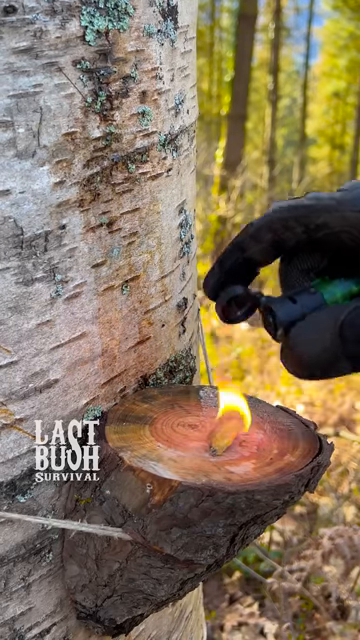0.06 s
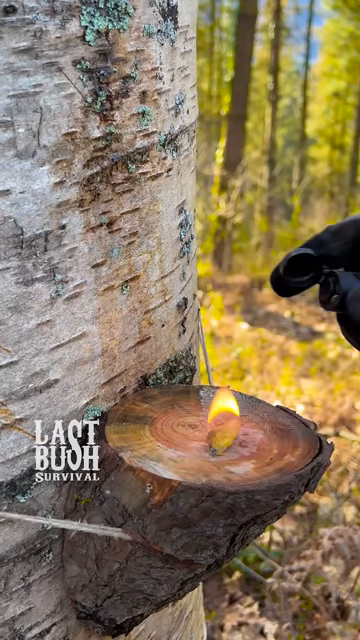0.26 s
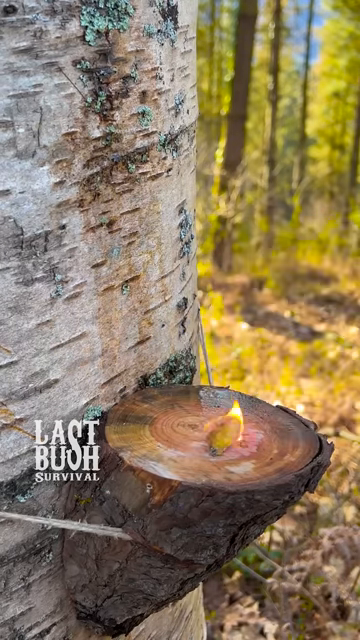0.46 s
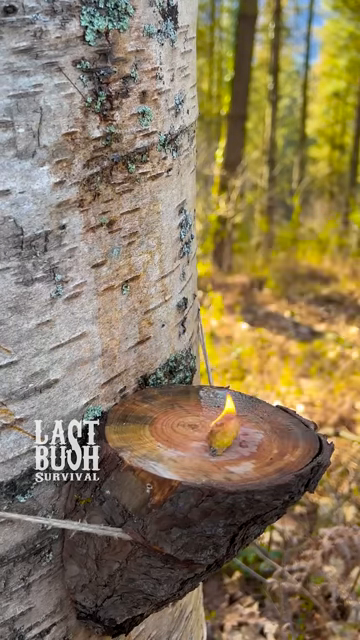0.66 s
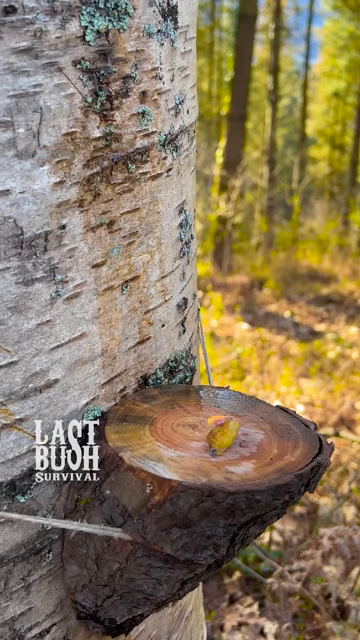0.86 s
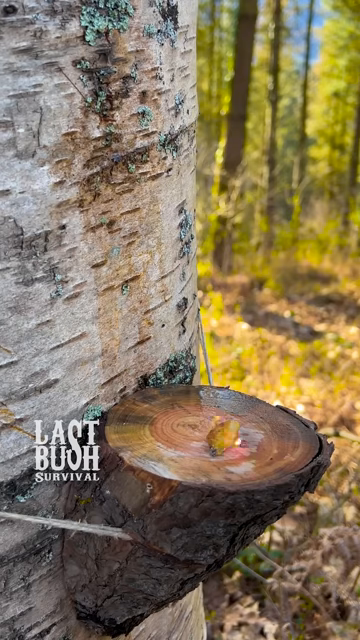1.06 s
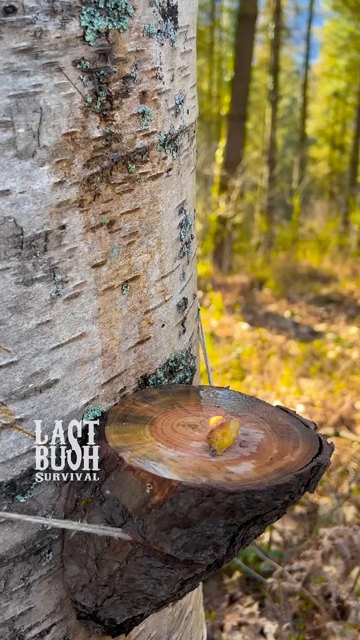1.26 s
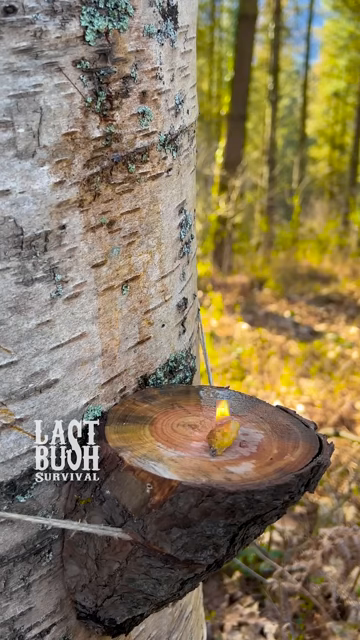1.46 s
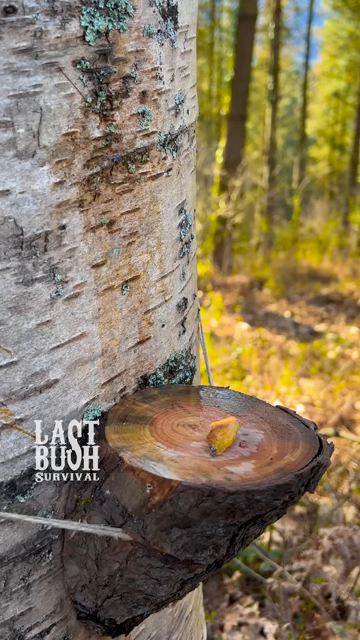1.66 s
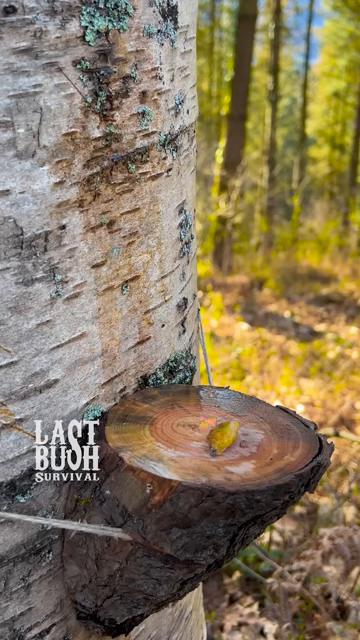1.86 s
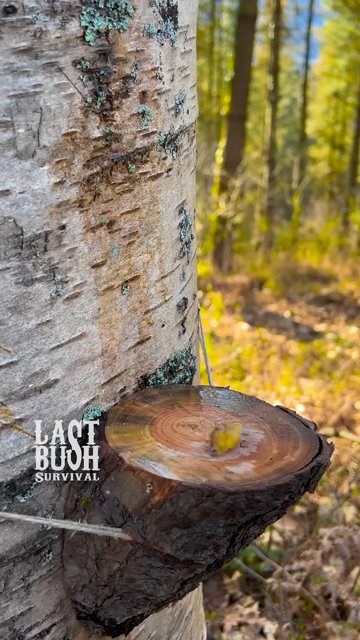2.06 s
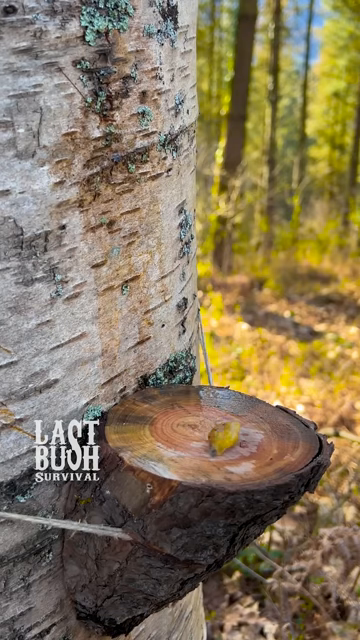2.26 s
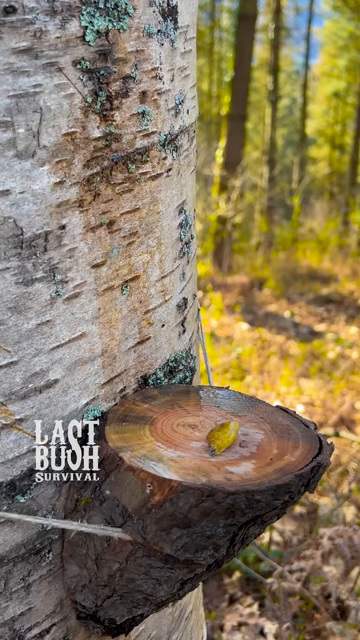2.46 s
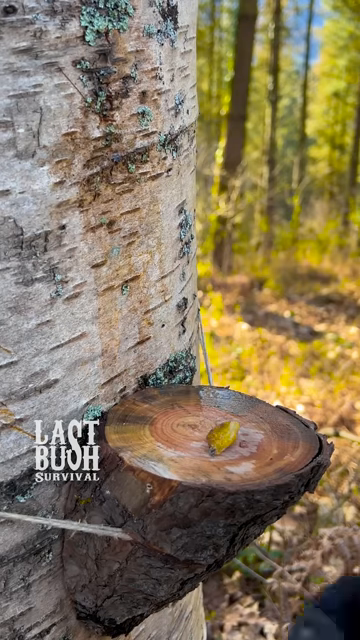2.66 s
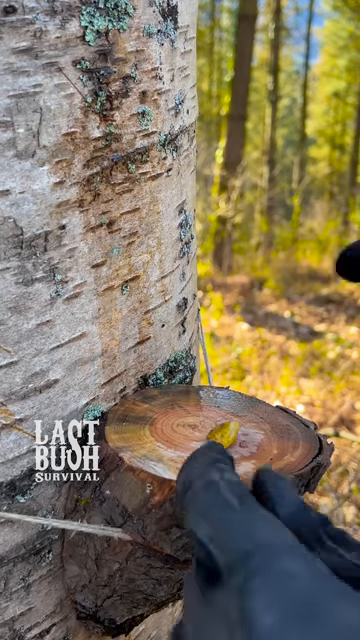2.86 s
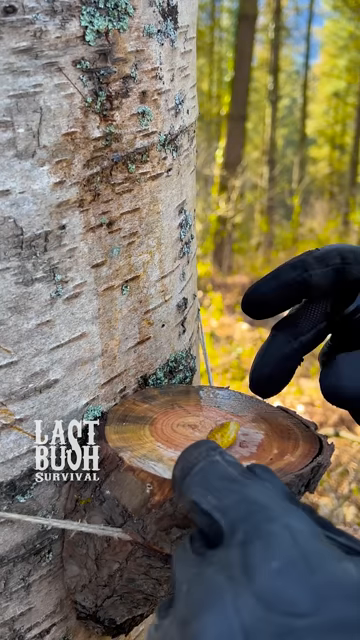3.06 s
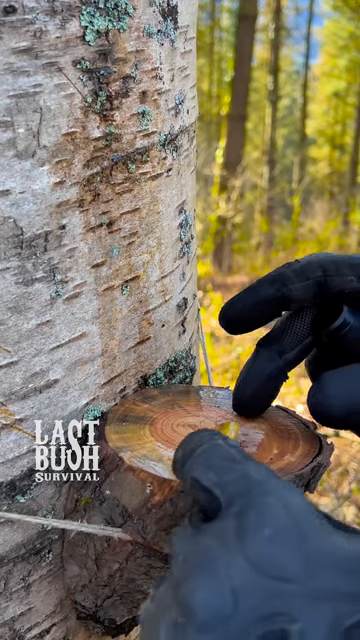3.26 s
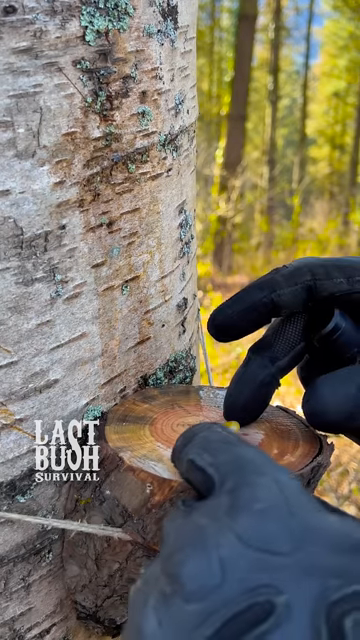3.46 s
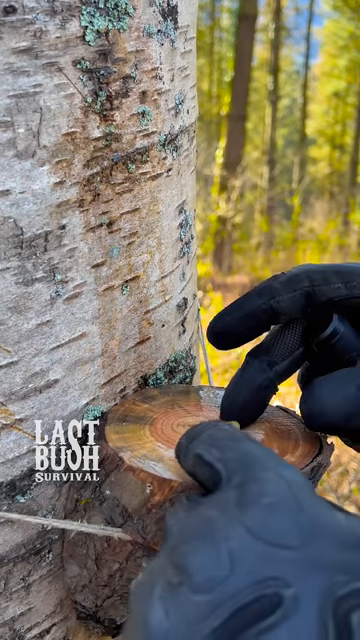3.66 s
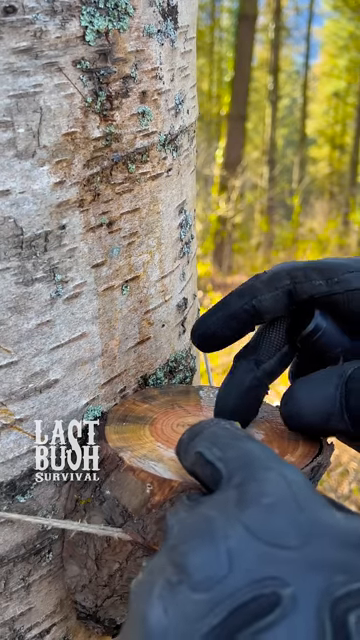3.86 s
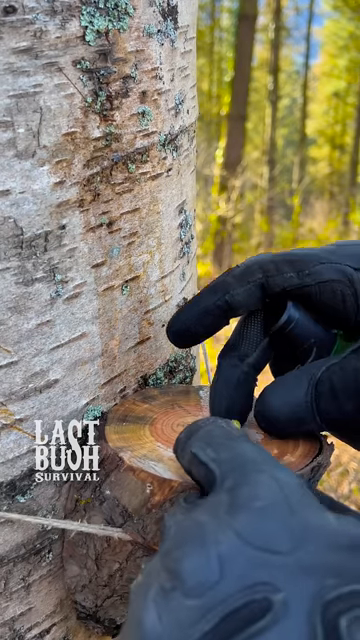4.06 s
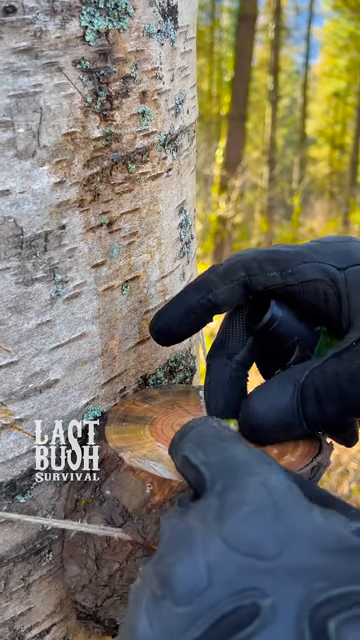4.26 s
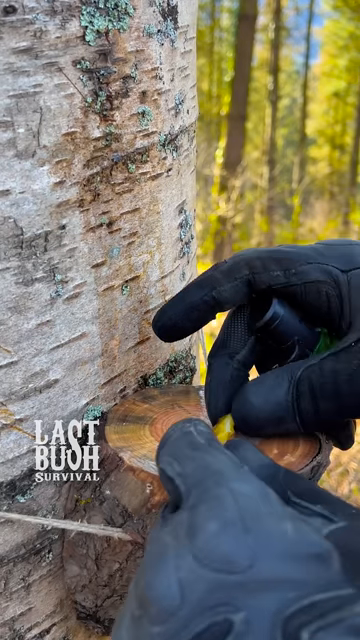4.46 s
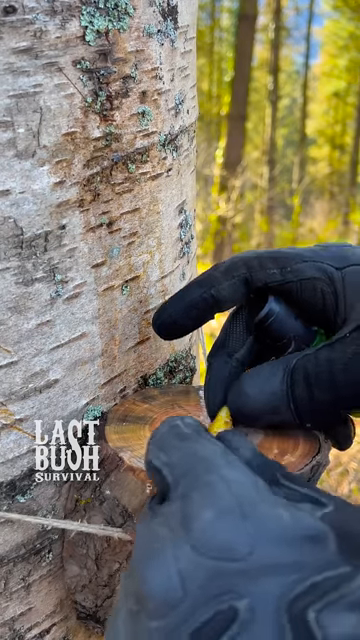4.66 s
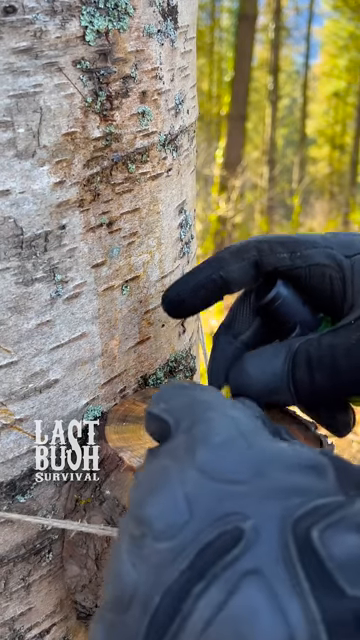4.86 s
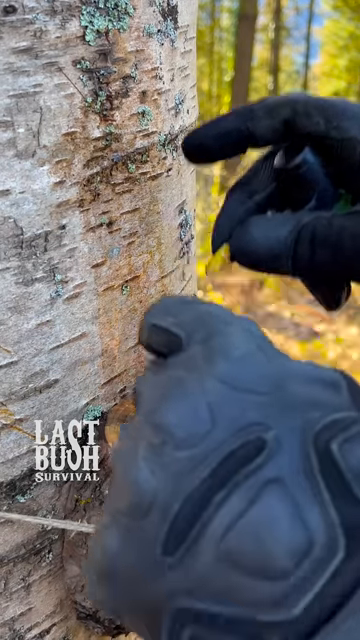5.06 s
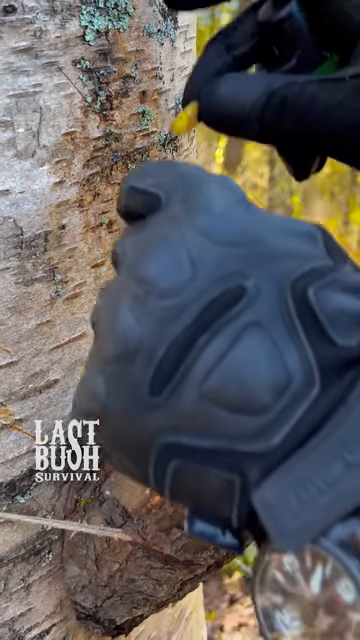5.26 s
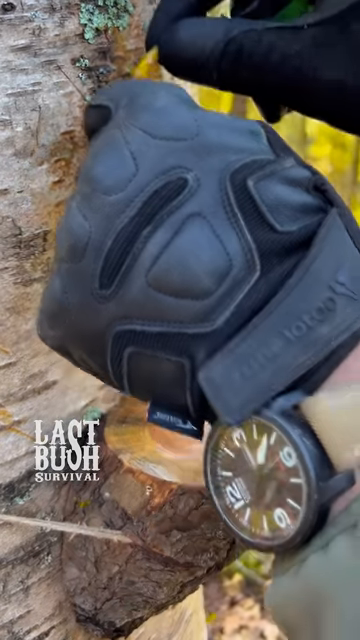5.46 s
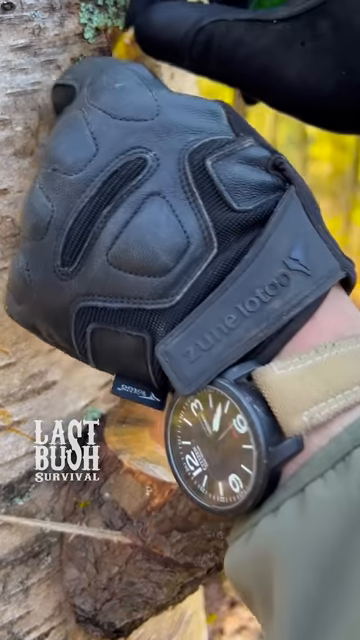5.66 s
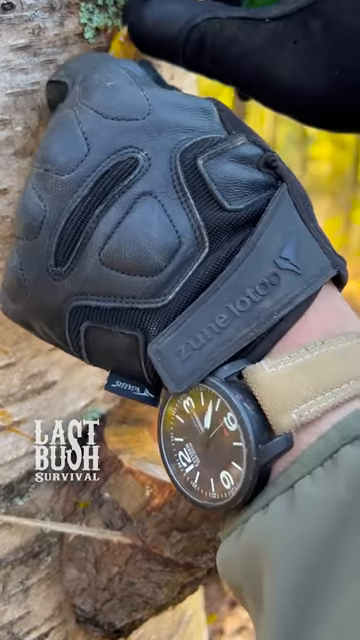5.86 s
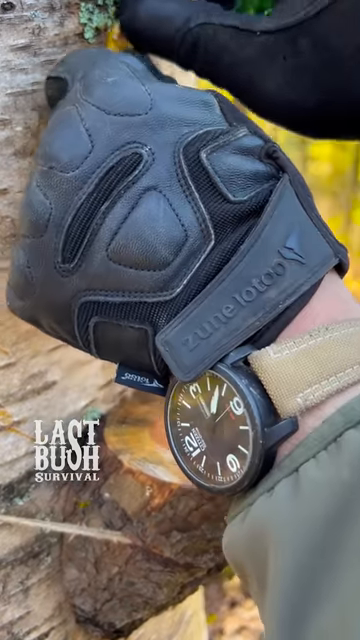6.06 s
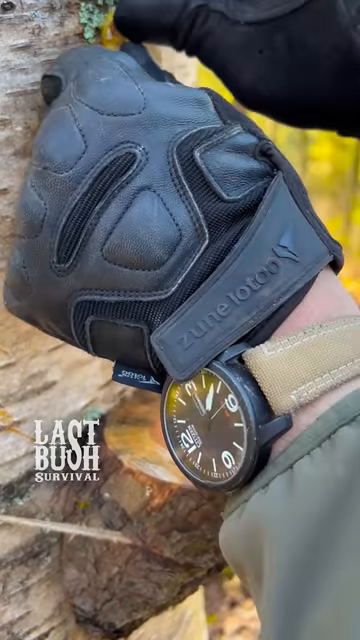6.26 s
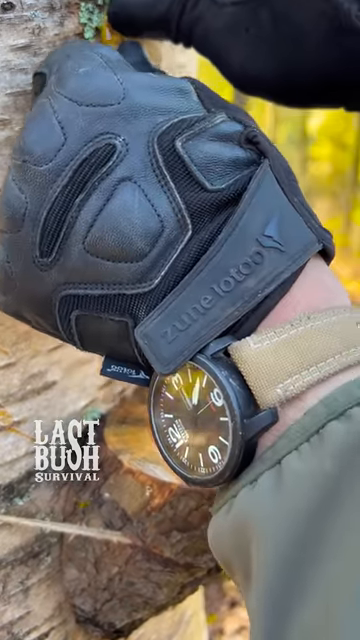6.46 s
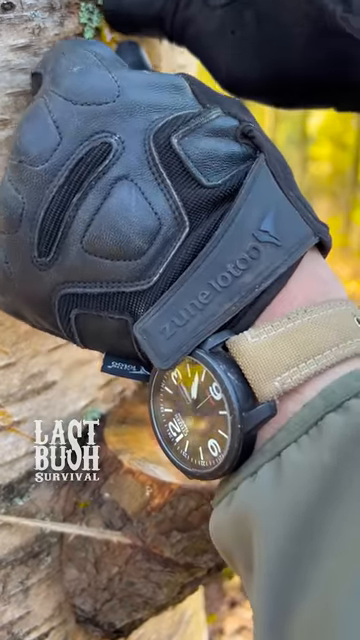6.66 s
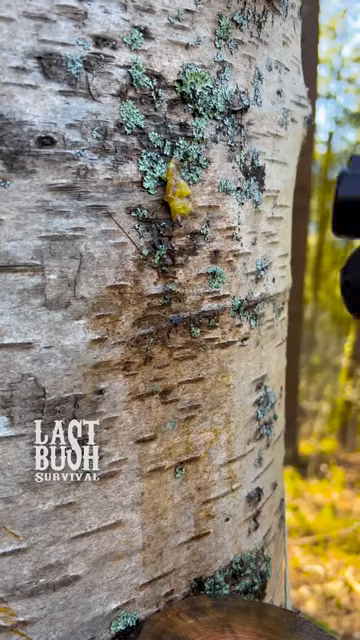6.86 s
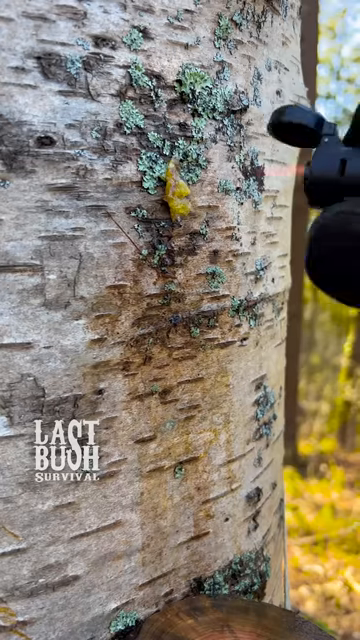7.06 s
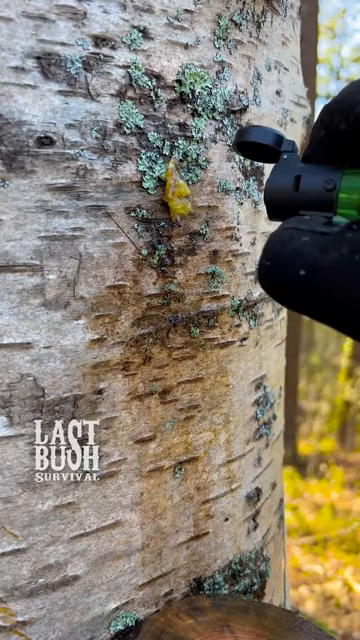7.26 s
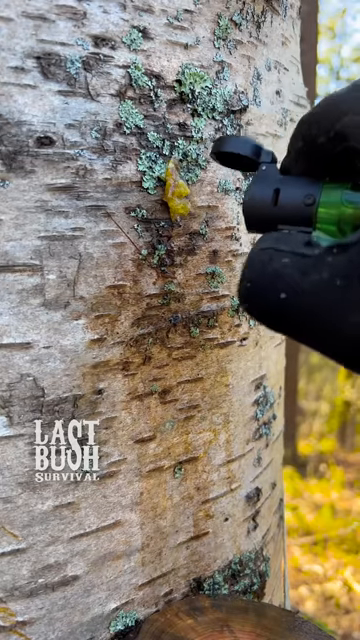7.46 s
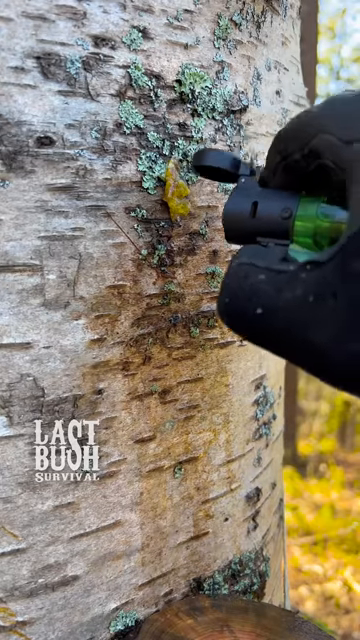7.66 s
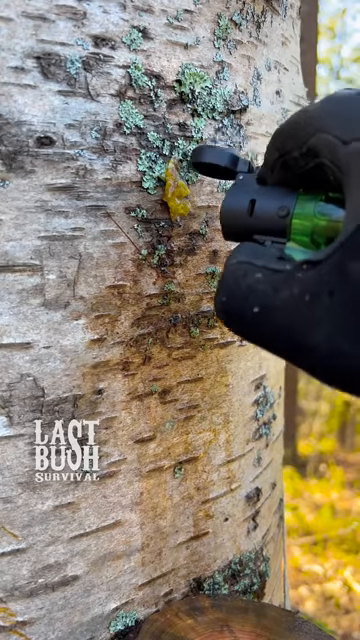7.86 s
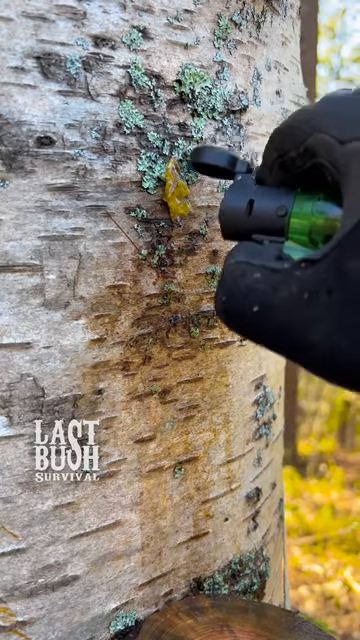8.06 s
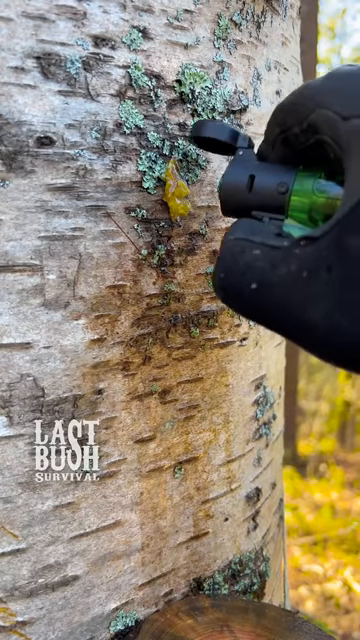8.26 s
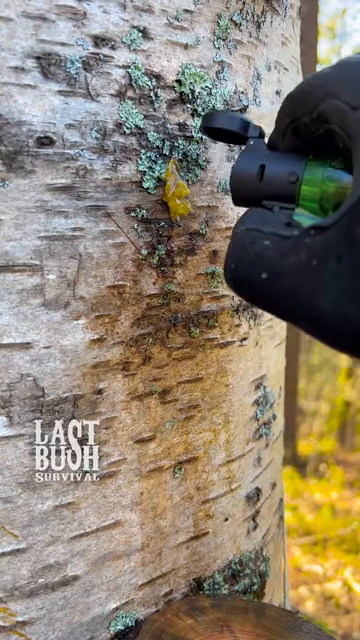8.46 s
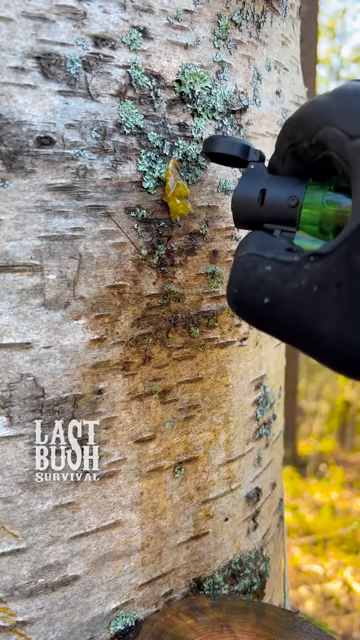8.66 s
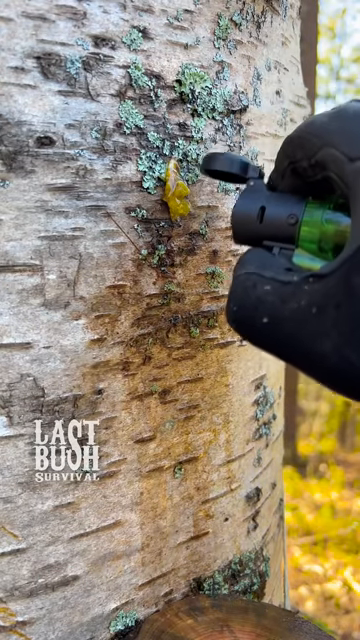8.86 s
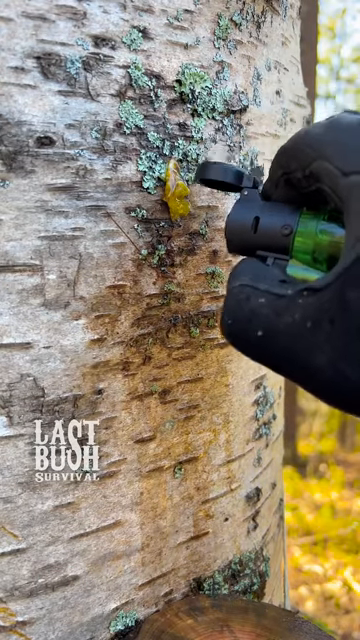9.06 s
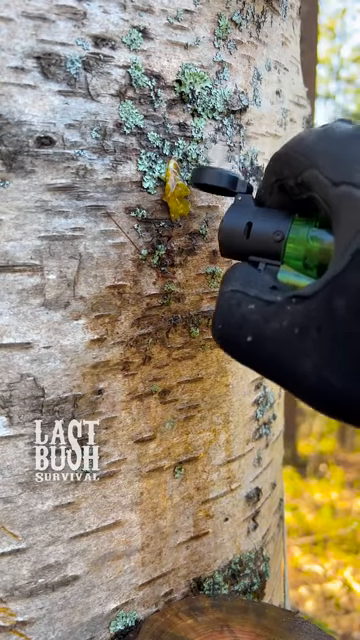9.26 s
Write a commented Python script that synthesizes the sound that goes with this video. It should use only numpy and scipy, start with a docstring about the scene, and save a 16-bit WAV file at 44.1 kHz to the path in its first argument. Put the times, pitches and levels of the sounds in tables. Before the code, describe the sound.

The sounds are small and close to the microphone, outdoors in a forest. For the first two seconds burning resin ticks, sizzles and spits faintly, while a nearby bird gives quick chirps. A lighter's plastic cap clicks lightly around 0.5 seconds and sharply at 0.8. From about 1 to 4.5 seconds faint, wavering bird whistles echo in the distance. Gloves rustle softly over light wind, with dull handling bumps near 1.9 and 5.4 seconds. Clear, falling chirps come close by around 4.8 to 5.3 seconds. Between 6.9 and 7.1 seconds a jet lighter gives several sharp clicks, a brief gas hiss and a small thump as it lights. Its flame then hisses steadily with a soft roar until the end, just after 9 seconds. More chirps sound from 7.2 to 7.9 seconds, and stronger wind rumble and an intermittent low hum run underneath.

```python
"""A jet lighter in a wood, close to a pair of microphone ports. First burning resin crackles, sizzles and
spits, the lighter's cap and trigger click, and birds whistle near and far among echoing trunks. Gloves
rustle, while wind and handling rumble on the ports. Near 7 s the lighter clicks again and gas hisses from
the nozzle; then the jet lights and its turbulent flame roars to the end, over stronger wind and a low hum.
Throughout, the flame, the rustle and the background air are dulled below a sliding edge."""
import sys
import numpy as np
from scipy import signal
from scipy.fft import rfft, irfft, next_fast_len
from scipy.io import wavfile

SR = 44100
rng = np.random.default_rng(int(sys.argv[2]) if len(sys.argv) > 2 else 0)


def dump_mix(stems):
    """Bounce the given channels to the path in sys.argv[1] as a 16-bit WAV at rate SR."""
    frames = np.atleast_2d(stems).T  # one column per channel
    limited = np.clip(frames, -1, 1)  # hard clip at full scale
    pcm = np.round(limited * 32767).astype(np.int16)
    wavfile.write(sys.argv[1], SR, pcm)


N = 410571

# Transfer paths from a source to the two ports.
# Each row: frequency in Hz, left gain in dB, right gain in dB, coherence from 0 to 1.
CLICK_PATH = [(705, -47, -30.5, 0.84), (1580, -18.5, -30, 0.86), (2150, -33, -24, 0.39),
              (2940, -19, -9.5, 0.7), (3560, -22, -51, 0.23), (4020, -7.5, -10, 0.34),
              (5270, -13, -13.5, 0.31), (6640, -19.5, -14.5, 0.15), (8460, -7.5, -9.5, 0.37),
              (9460, -5.5, -3, 0.82), (10100, -1, -7.5, 0.97), (12200, -12.5, -11.5, 0.92),
              (14000, -14, -13, 0.52), (15600, -8, -9, 0.86)]
RUSTLE_PATH = [(300, -13, -15, 0.51), (735, -12, -5, 0.72), (1400, -12.5, -8, 0.43),
               (2670, -12.5, -6.5, 0.17), (4240, -2, -2, 0.07), (5780, -11.5, -12.5, 0.37),
               (6830, -10.5, -8, 0.18), (8260, -4, -7.5, .28), (8900, -15, -4.5, 0.3),
               (10270, 1, 1.5, 0.99), (11500, -3, -6, 1), (12800, -5, -3, 0.77), (15400, -2.5, -6, 0.8)]
BIRD_PATH = [(1000, 11.4, 1.2, 0.1), (2490, 4, 2.9, 0.59), (3690, 6.63, 0.32, 0.29), (4860, 9, 0.13, 1)]
# Phase of the right port against the left, for sound from all around and from the lighter's side.
# Each row: frequency in Hz, phase in radians.
PHASE_AROUND = [(20, .2), (300, .5), (800, 2.7), (5500, 3.0), (7000, .4), (8100, 1.4), (10400, 3.1),
                (13000, 5.9), (15600, 8.3)]
PHASE_ASIDE = [(250, .2), (900, -1.8), (1500, -3.3), (1850, -4.7), (3000, -3.8), (4300, -6.6), (7500, -5.7),
               (10400, -3.1), (13000, -.3), (15600, 2.0)]
CATCH_S = 7.084   # the flame has caught: unlit gas and rustle stop


def jet():
    """Turbulence radiates broadband noise: flame roar below, nozzle hiss above, a fizz between."""
    # Path of the jet. Each row: frequency in Hz, left and right gain in dB, coherence.
    jet_path = [(249.7, -11.5, -11.5, 1), (423, -11, -6, 0.66), (940, 0.5, -4, 1), (1660, -5, 2.5, 1),
                (1683, -0.5, -3.5, 0.079), (3370, -7.5, -14, 0.92), (4390, -16.5, -19, 0.32),
                (4840, -19.5, -26.5, 0.37), (6070, -34, -26.5, 0.2), (6760, -25.5, -24, 0.46),
                (8100, -33, -31.5, .1), (9050, -32, -25.5, 1), (9400, -24, -25, .8), (9600, -29, -27, 1),
                (10800, -28, -29, 1), (11000, -15, -15.5, 1), (12000, -15, -15.5, 0.84),
                (13700, -10, -10, 0.88), (14600, -8.5, -8.5, 1), (15700, -11, -12, 0.9)]
    # Faint whistles of the nozzle. Each row: frequency in Hz, width in Hz, lift in dB.
    whistles = [(1790, 220, 2.5), (2310, 160, 2.5), (3500, 300, 1), (5000, 210, 6), (5640, 100, 9),
                (6430, 450, 8), (9500, 500, 3.5)]
    # Nozzle hiss once lit. Each row: time in seconds, level in dB.
    hiss_curve = [(7.1, -68), (7.2, -49), (7.27, -49), (7.31, -49), (7.45, -46), (7.55, -49), (7.66, -44.5),
                  (7.69, -48), (8.09, -45.5), (8.47, -52), (8.55, -47), (8.66, -48), (8.78, -44.5),
                  (8.86, -50.5), (9.02, -42.5), (9.06, -48), (9.3, -44)]
    lit = round(7.08 * SR)
    t = np.arange(N - lit) / SR
    flow = ports(noise(flicker_db=.55, rate_hz=6), jet_path, PHASE_ASIDE)[:, lit:]
    for hz, width_hz, lift_db in whistles:
        flow = flow + (from_db(lift_db) - 1) * band(flow, hz - width_hz / 2, hz + width_hz / 2, order=1)
    roar, treble = split(flow, 5200)
    fizz, hiss = split(treble, 9800)
    roar_db = np.interp(t, [0, .28], [-61.5, -44])
    fizz_db = np.interp(t, [0, .21], [-63, -54]) + 3.1 * drift(4)[lit:]
    for patch_hz in (11200, 12800), (12800, 14300), (14300, 16500):   # patches of hiss come and go
        hiss = hiss + (from_db(1.3 * drift(7.3)[lit:]) - 1) * band(hiss, *patch_hz, order=1)
    flame = from_db(roar_db) * unit_rms(roar, 1550, 2060) + from_db(fizz_db) * unit_rms(fizz, 3760, 14400)
    flame += from_db(in_time(hiss_curve)[0][lit:]) * unit_rms(hiss, 10500, 19000)
    return np.pad(flame, [(0, 0), (lit, 0)])


def unlit_gas():
    """Flow through the nozzle makes a band of bright noise, growing until the flame catches."""
    start_s, final_db, growth_db_per_s = 6.94, -53, 30
    t = np.arange(N) / SR
    gain = (t > start_s) * (t < CATCH_S) * from_db(final_db - growth_db_per_s * np.abs(CATCH_S - t))
    hiss = band(noise(flicker_db=1, rate_hz=30), 7450, 11700)
    return gain * unit_rms(ports(hiss, CLICK_PATH, PHASE_ASIDE), 9200, 12000)


def snaps():
    """Impacts of cap and trigger excite a damped resonance of the plastic shell."""
    # Each row: start in seconds, relative level in dB, the crack's time to fall 60 dB in seconds,
    # the shell's share in dB.
    impacts = [(0.499, -18, 0.018, -1), (0.5677, -14, 0.008, -26), (0.7017, -21.5, 0.025, 1),
               (0.801, -6.5, 0.012, 5.5), (0.816, -2.5, 0.017, -40), (6.918, -30, .012, 6),
               (6.9326, -5.5, 0.032, 1.5), (6.975, -11.5, 0.034, 2.5), (7.078, -22, .02, 0),
               (7.0872, -2, 0.013, -5)]
    start_s, level_db, t60_s, shell_db = np.transpose(impacts)
    crack = bursts(start_s, level_db + 2, t60_s)
    crack += (from_db(-7.5) - 1) * band(crack, 1800, 3600, order=1)   # hollow between knock and thin top
    shell = band(bursts(start_s, level_db + shell_db, 1.37 * t60_s), 4300, 6600)
    return ports(crack + shell, CLICK_PATH, PHASE_ASIDE)


def resin_crackles():
    """Burning resin gives off impulses: thin ticks that decay exponentially."""
    # Each row: start in seconds, relative level in dB.
    crackles = [(0.0476, -15.5), (0.1437, -31), (0.171, -23.5), (0.2599, -37), (0.3198, -38), (0.2087, -26),
                (0.2174, -31), (0.366, -33), (0.396, -25), (0.602, -24), (0.8643, -22), (0.9244, -26),
                (1.3604, -33), (1.6842, -36), (1.7361, -34), (2.415, -34), (1.413, -26), (1.478, -24.5),
                (1.485, -27), (1.528, -37), (1.5873, -33), (1.6452, -34), (1.7893, -22.5), (2.141, -28.5),
                (2.2485, -31), (2.2862, -40), (2.3377, -32), (3.4575, -31), (4.573, -35), (6.081, -35),
                (6.412, -39), (6.8346, -29), (6.8538, -25), (6.871, -20), (7.4577, -18), (7.9184, -31),
                (7.957, -28), (9.2822, -15.5)]
    start_s, level_db = np.transpose(crackles)
    ticks = bursts(start_s, level_db, t60_s=np.full(len(crackles), .0091))
    return ports(split(ticks, 3800)[1], CLICK_PATH, PHASE_ASIDE)


def resin_sizzle():
    """Tiny treble crackles in the burning resin arrive independently, as a Poisson process."""
    end_s, per_s = 2.1, 30
    onsets = (rng.random(N) < per_s / SR) * (np.arange(N) / SR < end_s)
    impulses = onsets * from_db(-39 + 4.3 * rng.exponential(1, N))
    decays = signal.lfilter([1], [1, -.93], impulses + 1e-18)
    return split(ports(decays * rng.standard_normal((2, N)), CLICK_PATH, PHASE_ASIDE), 5200)[1]


def resin_spits():
    """Vapour escaping from the resin makes a bright hiss with a sudden attack and a slower decay."""
    # Each row: start in seconds, length in seconds, level in dB.
    spits = [(0, 0.02, -51), (.21, .015, -61), (.505, .03, -59), (.926, 0.015, -53), (1.22, 0.035, -59),
             (1.9, 0.028, -55), (2.416, .05, -64)]
    gain, = swells(spits, rise_db_per_s=2000, fade_db_per_s=161)
    vapour = ports(noise(flicker_db=1.5, rate_hz=40), RUSTLE_PATH, PHASE_ASIDE)
    return gain * unit_rms(split(vapour, 11400)[1], 9400, 20800)


def near_bird():
    """Fast frequency sweeps make chirps; close by, direct sound outweighs reverberation."""
    # Single chirps, then the notes of three phrases, timed from the start of the phrase.
    # Each row: start and length in seconds, first and last pitch in Hz, relative level in dB.
    chirps = [(.168, 0.0071, 2650, 3660, -26.5), (.171, 0.017, 3780, 3340, -28),
              (.218, 0.019, 4590, 3200, -32), (.285, 0.04, 3810, 3530, -31.5),
              (.41, 0.018, 3730, 3070, -34), (.424, 0.0079, 3700, 3700, -29.5),
              (.62, 0.012, 3830, 3450, -37), (5.257, 0.024, 4090, 4240, -36.5),
              (.535, 0.033, 3040, 2317, -34), (.565, .04, 2280, 2367, -37.5),
              (.735, 0.022, 2860, 2810, -30), (3.575, 0.029, 2530, 2210, -43),
              (4.19, 0.11, 1890, 1575, -51), (4.31, 0.052, 3060, 3330, -49),
              (4.35, 0.055, 3390, 2810, -42.5), (4.58, 0.07, 2530, 2160, -39),
              (4.85, 0.058, 4540, 4550, -48.5), (5.18, 0.084, 3300, 2790, -37),
              (7.41, 0.042, 4600, 4560, -41), (.52, 0.026, 2250, 1950, -49), (.405, .025, 2110, 2010, -50),
              (5.235, 0.028, 2746, 4100, -28.5), (5.289, 0.042, 4070, 2910, -29.5),
              (7.783, 0.04, 2143, 4010, -27.5), (7.85, 0.019, 3850, 3480, -28)]
    warble = [(0, .024, 2650, 4000, -0.5), (.027, .014, 3850, 3000, -9), (.036, .044, 3110, 2150, 0.5)]
    lead = [(0, 0.028, 2840, 2500, 1), (.002, 0.018, 3560, 3300, 2.5)]
    fall = [(0.0021, 0.032, 3720, 2267, 0)]
    # When each phrase is sung. Each row: start in seconds, gain in dB.
    warble_times = [(.259, -29), (.458, -34.5), (0.654, -38.5)]
    lead_times = [(4.777, -34), (7.2, -45)]
    fall_times = [(4.863, -19.5), (7.284, -20.5), (7.426, -20)]
    notes = list(chirps)
    for phrase, times in (warble, warble_times), (lead, lead_times), (fall, fall_times):
        for start_s, gain_db in times:
            notes += [(start_s + after_s, *glide, gain_db + db) for after_s, *glide, db in phrase]
    return song(notes, echo_db=-10, t60_s=.4, pan_db=.7, waver_share=0)


def far_birds():
    """Wavering whistles from a distance, where reverberation outweighs direct sound."""
    # Each row: start and length in seconds, first and last pitch in Hz, relative level in dB.
    whistles = [(.88, 0.073, 2955, 2860, -51), (.685, 0.12, 2603, 2530, -49),
                (1.055, 0.15, 3210, 2960, -49), (1.22, 0.096, 3150, 3340, -51),
                (1.37, 0.17, 2750, 2573, -52), (1.64, 0.28, 3190, 2934, -52),
                (1.7, 0.12, 2890, 2800, -57.5), (1.865, 0.04, 3564, 3440, -47.5),
                (1.95, 0.079, 2950, 2875, -57), (2.06, 0.14, 3320, 3122, -49.5),
                (2.37, 0.118, 2560, 2637, -59), (2.225, 0.12, 2480, 2422, -52),
                (3.25, 0.1, 1996, 1954, -61.5), (3.44, 0.12, 2576, 2570, -60.5),
                (3.8, 0.35, 1784, 1714, -55.5), (3.8, 0.12, 2140, 2190, -59.5),
                (3.95, 0.05, 2246, 2440, -57), (4.09, 0.2, 1982, 1880, -46.5),
                (4.25, 0.22, 1504, 1476, -64.5)]
    return song(whistles, echo_db=3.5, t60_s=1.53, pan_db=-4, waver_share=.0149)


def song(notes, echo_db, t60_s, pan_db, waver_share):
    """Gliding pure tones are convolved with the exponentially decaying echoes of the trunks."""
    direct, waver = np.zeros(N), 1 + waver_share * drift(31.6)
    for start_s, length_s, from_hz, to_hz, level_db in notes:
        progress, at = np.linspace(0, 1, round(length_s * SR)), round(start_s * SR)
        span, rising = slice(at, at + len(progress)), to_hz > from_hz
        pitch_hz = from_hz * (to_hz / from_hz) ** (progress ** (.9 if rising else .7)) * waver[span]
        envelope = np.sqrt(np.sin(np.pi * progress)) if rising else np.sin(np.pi * progress ** .5)
        direct[span] += from_db(level_db) * envelope * np.sin(2 * np.pi * np.cumsum(pitch_hz) / SR)
    t = np.arange(SR) / SR
    response = rng.standard_normal((2, SR)) * from_db(-60 * t / t60_s) * np.minimum(t / .0033, 1)
    response *= from_db(echo_db) / np.sqrt(np.sum(response[0] ** 2))
    echoes = signal.fftconvolve(direct[None], response, axes=1)[:, :N]
    return from_db([[pan_db], [-pan_db]]) * ports(direct + echoes, BIRD_PATH, PHASE_AROUND)


def echo_wash():
    """Multiple scattering between trunks blurs birdsong into two bands of noise."""
    # Each row: start and length in seconds, level of the lower and of the higher band in dB.
    washes = [(.2, 0.11, -61, -61), (.33, 0.36, -54.5, -81), (4.775, 0.2, -44.5, -68),
              (5.27, 0.035, -49, -53), (7.195, 0.16, -43, -74), (7.41, 0.015, -46, -68),
              (7.82, .05, -48, -51)]
    bands_hz = (2300, 3540), (3540, 4530)
    gains = swells(washes, rise_db_per_s=3000, fade_db_per_s=47)
    blur = ports(noise(flicker_db=1.5, rate_hz=15), BIRD_PATH, PHASE_AROUND)
    return sum(gain * unit_rms(band(blur, *hz, order=4), *hz) for gain, hz in zip(gains, bands_hz))


def glove_rustle():
    """Friction of gloves and sleeves makes a soft, grainy hiss until the flame catches."""
    # Each row: start and length in seconds, relative body level and treble level in dB.
    movements = [(0, 0.026, -58.5, -50.5), (.94, 0.014, -64, -71), (1.3, 0.16, -69, -68),
                 (1.95, 0.0043, -59, -63), (2.53, 0.41, -57, -57.5), (3.14, 0.064, -63, -65),
                 (4.75, 0.035, -60.5, -62), (5.22, 0.19, -63, -59.5), (6.1, 0.072, -69.5, -63),
                 (6.46, .01, -79, -71), (6.89, 0.044, -56.5, -59), (6.99, 0.1, -55, -44.5)]
    # Faint hiss between movements. Each row: time in seconds, relative body level and treble level in dB.
    hush = [(0, -79, -70), (.7, -66, -63), (2.3, -68.5, -68), (3.45, -67.5, -68), (3.66, -72, -83),
            (4.45, -68.5, -82), (4.9, -67.5, -65), (5.7, -66, -63.5), (5.98, -70.5, -81), (6.4, -66, -68.5),
            (6.62, -68.5, -69), (6.83, -80, -89)]
    moving = swells(movements, rise_db_per_s=120, fade_db_per_s=164)
    body_gain, treble_gain = np.hypot(from_db(in_time(hush)), moving)
    grains = (rng.random(N) < 150 / SR) * from_db(2 * np.minimum(rng.exponential(1, N), 4))
    roughness = 1 + signal.lfilter([.6], [1, -.96], grains)
    rubbing = roughness * noise(flicker_db=1.3, rate_hz=4.5)
    body, treble = split(ports(rubbing, RUSTLE_PATH, PHASE_AROUND), 7130)
    rustle = from_db(-6) * body_gain * unit_rms(body, 4850, 6770)
    rustle += treble_gain * unit_rms(treble, 9400, 20800)
    return rustle * (np.arange(N) < CATCH_S * SR)


def hand_thumps():
    """Structure-borne knocks through the hand reach both ports alike, each as two damped tones."""
    # Each row: start in seconds, the push's relative level in dB and final pitch in Hz,
    # the level in dB and pitch in Hz of the knock on the case.
    thumps = [(0.804, -52.5, 109, -64, 900), (0.817, -58, 111, -37, 1500), (1.075, -47, 99, -59, 900),
              (1.158, -52, 101, -63, 900), (1.242, -45.5, 104, -58, 900), (1.455, -56, 91, -67, 900),
              (1.927, -36, 40.8, -47, 900), (5.386, -33.5, 70.6, -43, 890), (5.957, -46, 97, -56, 900),
              (6.559, -46, 65, -60, 900), (6.934, -38.5, 103, -36, 820), (6.9758, -46.5, 129, -55, 600),
              (7.0903, -28.5, 73, -41, 910)]
    pitch_excess, sag_s, rise_s, fade_s = 4.1, .0043, .0064, .007
    thuds, t = np.zeros(N), np.arange(4000) / SR
    sagging_time = t + pitch_excess * sag_s * (1 - np.exp(-t / sag_s))   # pitch sags as the push relaxes
    envelope = 2.5 * (1 - np.exp(-t / rise_s)) * np.exp(-t / fade_s)
    for start_s, push_db, push_hz, knock_db, knock_hz in thumps:
        push = from_db(push_db) * envelope * np.sin(2 * np.pi * push_hz * sagging_time)
        knock = from_db(knock_db) * np.exp(-t / .0019) * np.sin(2 * np.pi * knock_hz * t)
        at = round(start_s * SR)
        thuds[at:at + len(t)] += push + knock
    return thuds


def wind_rumble():
    """Pressure fluctuations from wind and handling make lumpy low noise, much alike in both ports."""
    # Path of the rumble. Each row: frequency in Hz, left and right gain in dB, coherence.
    rumble_path = [(25, -40, -33, 0.98), (53.4, -12, -2, 0.78), (74, -3, -9.5, 0.99), (104, -8.5, -7, 0.51),
                   (226, -7, -9, 1), (470, -16, -11.5, 0.54), (1020, -34, -33, 1)]
    # Steady wind. Each row: time in seconds, relative deep and upper level in dB.
    breeze = [(0, -68, -86), (.75, -92, -92), (1.15, -66, -62.5), (1.8, -100, -79), (2.3, -71, -71.5),
              (2.65, -57.5, -58), (4.3, -61, -63), (5.0, -56, -54), (5.7, -58.5, -57), (6.3, -52, -68.5),
              (7.0, -62, -60), (7.13, -50, -56.5), (7.4, -38.5, -53), (8.04, -69, -55.5), (8.4, -46.5, -54),
              (9.31, -41.5, -45.5)]
    # Gusts and handling bumps. Each row: start and length in seconds, relative deep and upper level in dB.
    gusts = [(.05, 0.0032, -61, -59), (.35, 0.011, -70, -64), (.8, 0.16, -88, -60), (1.08, 0.037, -59, -55),
             (1.93, 0.018, -46, -51), (2.8, 0.2, -69, -56), (3.4, 0.44, -69, -58.5),
             (4.78, 0.028, -58, -75), (5.17, 0.15, -58, -51.5), (5.41, 0.034, -44.5, -47.5),
             (5.95, 0.039, -56, -54.5), (6.7, 0.12, -45.5, -65), (7.04, 0.026, -50, -73),
             (8.2, 0.14, -50, -47), (8.8, 0.15, -38, -45)]
    gusting = swells(gusts, rise_db_per_s=293, fade_db_per_s=198)
    deep_gain, upper_gain = np.hypot(from_db(in_time(breeze)), gusting)
    deep, upper = split(ports(noise(flicker_db=3, rate_hz=14), rumble_path, PHASE_AROUND), 116)
    return (from_db(-7.5) * deep_gain * unit_rms(deep, 40, 160)
            + from_db(-6.5) * upper_gain * unit_rms(upper, 94, 390))


def hum():
    """A low tone comes and goes under the wind, randomly modulated in amplitude and frequency."""
    # Each row: start and length in seconds, pitch in Hz, level in dB.
    spells = [(6.11, 0.27, 97, -59.5), (6.58, 0.21, 95, -53.5), (7.203, 0.36, 77, -45),
              (7.71, 0.21, 76.5, -54.5), (8.167, 0.66, 74.2, -46.5), (9.153, 0.17, 74, -48)]
    start_s, length_s, hz, level_db = np.transpose(spells)
    gain, = swells(np.c_[start_s, length_s, level_db], rise_db_per_s=211, fade_db_per_s=211)
    flicker = from_db(.83 * drift(15))
    pitch_hz = in_time(np.c_[start_s, hz])[0] * (1 + .042 * drift(13.3))
    return np.sqrt(2) * gain * flicker * np.sin(2 * np.pi * np.cumsum(pitch_hz) / SR)


def squeak():
    """Narrow-band noise is heard as a pitch: one short, hollow squeak."""
    start_s, length_s, level_db = 1.9, .1, -56
    hollow = unit_rms(band(rng.standard_normal((2, N)), 1080, 1220), 800, 1600)
    progress = np.clip((np.arange(N) / SR - start_s) / length_s, 0, 1)
    return from_db(level_db) * np.sin(np.pi * progress) * hollow


def background_air():
    """The ambient noise floor: faint coloured noise with a slight flicker."""
    # Path of the air. Each row: frequency in Hz, left and right gain in dB, coherence.
    air_path = [(150, -16.5, -21, 0), (297, -8, -11, 0), (540, -10, -12.5, 0.47), (1010, -5, -11, 0.33),
                (1340, -7.5, -12.5, 0.48), (1830, -1, -2.5, 0.55), (4000, -6, -9.5, 0.58),
                (5400, -30, -36, 1), (6900, -17.5, -35, .1), (7920, -9.5, -24.5, .2), (8020, 1, -27, 0),
                (8080, -29, -34, 0.6), (10500, -47, -49, .95), (13000, -38, -22, 0.3),
                (15600, -19, -26, .7)]
    air = ports(noise(flicker_db=.77, rate_hz=34), air_path, PHASE_AROUND)
    return from_db(-68.5) * unit_rms(air, 480, 1514)


def dulled_lows(x):
    """A sliding shelf filter turns the lows down; a low edge cuts deeper and merges them to mono."""
    # Each row: time in seconds, edge frequency in Hz.
    edge_curve = [(0, 2660), (1.75, 2360), (2.0, 753), (2.4, 107), (6.85, 61.4), (6.9, 3820), (7.07, 3840),
                  (7.13, 1580), (7.32, 1280), (7.78, 202), (8.08, 936), (8.5, 62)]
    light_dip_db, full_dip_db, edge_octaves = -6, -22.5, .05
    hz, t, spectra = signal.stft(x, SR, nperseg=1024)
    edge_hz = np.interp(t, *np.transpose(edge_curve))
    below = (1 + np.tanh(np.log2(edge_hz / (hz[:, None] + 1)) / edge_octaves)) / 2
    depth = np.interp(edge_hz, [1000, 1590], [1, 0])
    merged = depth * spectra.mean(axis=0) + (1 - depth) * spectra
    dulled = from_db(light_dip_db + depth * (full_dip_db - light_dip_db)) * merged
    return signal.istft((1 - below) * spectra + below * dulled, SR, nperseg=1024)[1][:, :N]


def ports(pair, path, phases):
    """Partial coherence: left hears the first signal, right a phase-shifted mix of first and second."""
    size = next_fast_len(N)
    log_hz = np.log(np.arange(size // 2 + 1) * SR / size + 1)
    path_hz, *columns = np.transpose(path)
    left_db, right_db, coherence = [np.interp(log_hz, np.log(path_hz), c) for c in columns]
    coherence = np.clip(coherence, 0, 1)
    phase_hz, radians = np.transpose(phases)
    phase = np.interp(log_hz, np.log(phase_hz), radians)
    first, second = rfft(pair, size)
    right = (coherence * first + np.sqrt(1 - coherence ** 2) * second) * np.exp(1j * phase)
    return irfft([from_db(left_db) * first, from_db(right_db) * right], size)[:, :N]


def bursts(start_s, level_db, t60_s):
    """Transients: each burst of noise starts with a sharp spike and decays exponentially."""
    envelope, t = np.zeros(N), np.arange(3000) / SR
    spike = 1 + .37 * np.exp(-t / .00017)
    for s, db, t60 in zip(start_s, level_db, t60_s):
        at = round(s * SR)
        envelope[at:at + len(t)] += (from_db(db - 60 * t / t60) * spike)[:N - at]
    return envelope * rng.standard_normal((2, N))


def swells(rows, rise_db_per_s, fade_db_per_s):
    """One gain for each level column: every row rises, holds and fades, and the rows add in power."""
    at = np.arange(0, N, 128)
    start_s, length_s, *levels = np.transpose(rows)[:, :, None]
    age_s = at / SR - start_s
    shape_db = -rise_db_per_s * np.maximum(-age_s, 0) - fade_db_per_s * np.maximum(age_s - length_s, 0)
    return [np.interp(np.arange(N), at, np.linalg.norm(from_db(db + shape_db), axis=0)) for db in levels]


def noise(flicker_db, rate_hz):
    """Two independent white noises share one random amplitude modulation."""
    return rng.standard_normal((2, N)) * from_db(flicker_db * drift(rate_hz))


def drift(rate_hz):
    """Low-passed noise wanders slowly, with a standard deviation of 1."""
    knots = rng.standard_normal(int(N / SR * 200))
    pole = np.exp(-2 * np.pi * rate_hz / 200)
    slow = signal.lfilter([1], np.poly([pole, pole]), knots)
    slow = (slow - slow.mean()) / slow.std()
    return np.interp(np.linspace(0, len(slow) - 1, N), np.arange(len(slow)), slow)


def band(x, low_hz, high_hz, order=2):
    """Band-pass filter."""
    sos = signal.butter(order, [low_hz, min(high_hz, .45 * SR)], "band", fs=SR, output="sos")
    return signal.sosfilt(sos, x)


def split(x, hz):
    """Crossover: the parts below and above a frequency."""
    return [signal.sosfilt(signal.butter(4, hz, kind, fs=SR, output="sos"), x) for kind in ("low", "high")]


def unit_rms(x, low_hz, high_hz):
    """Normalisation: the channel mean gets rms 1 within the band."""
    return x / np.sqrt(np.mean(band(x.mean(axis=0), low_hz, high_hz, order=3) ** 2))


def in_time(rows):
    """Linear interpolation of a curve's columns at every sample."""
    time_s, *columns = np.transpose(rows)
    return [np.interp(np.arange(N) / SR, time_s, c) for c in columns]


def from_db(db):
    """Amplitude ratio of a level in decibels."""
    return 10 ** (np.asarray(db) / 20)


def scene():
    """Superposition of all sources at the two ports."""
    air = background_air()
    birds = near_bird() + far_birds() + echo_wash()
    dulled = dulled_lows(air + glove_rustle() + jet())
    lighter = unlit_gas() + snaps()
    resin = resin_crackles() + resin_sizzle() + resin_spits()
    return dulled + lighter + resin + birds + hand_thumps() + wind_rumble() + hum() + squeak()


def record(dry):
    """Band limiting: a steep low-pass is 60 dB down at 16 kHz."""
    return signal.sosfilt(signal.cheby2(22, 60, 16000, fs=SR, output="sos"), dry)


dry = scene()
out = record(dry)
dump_mix(out)
```